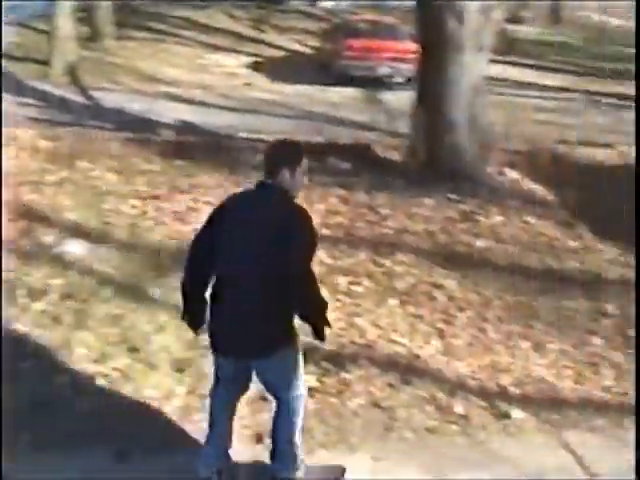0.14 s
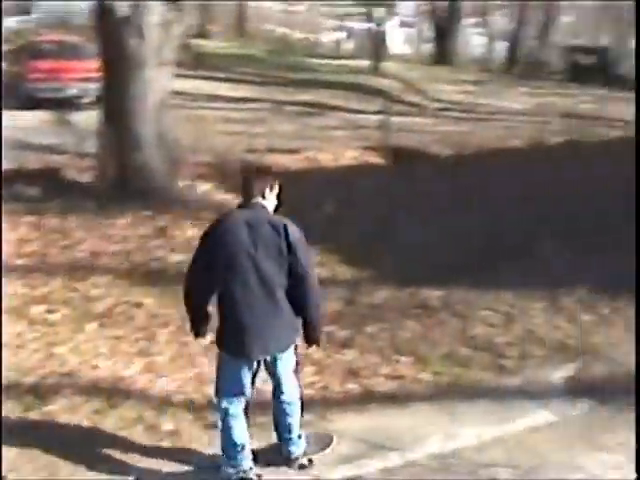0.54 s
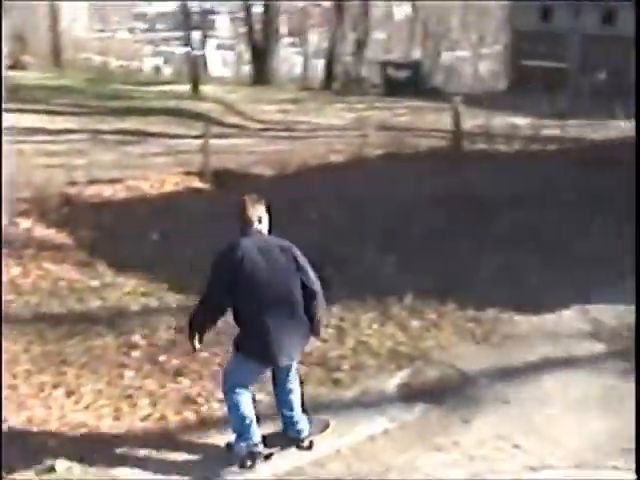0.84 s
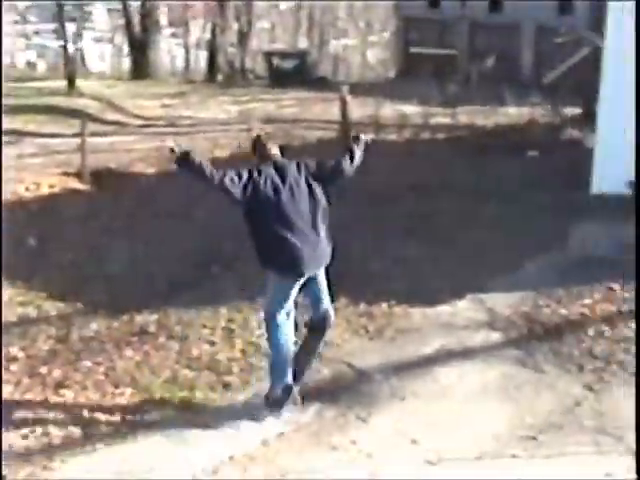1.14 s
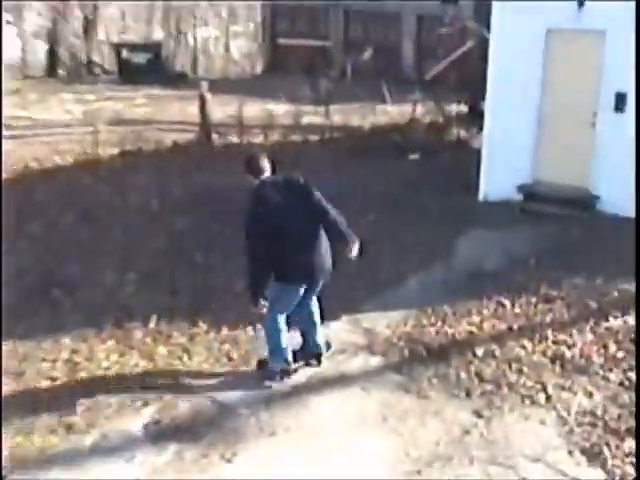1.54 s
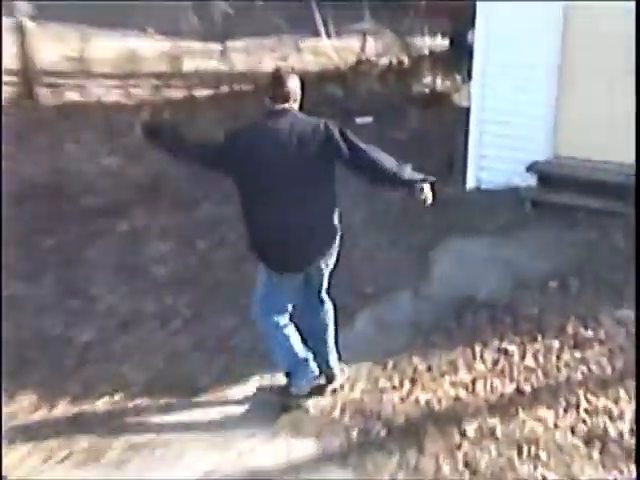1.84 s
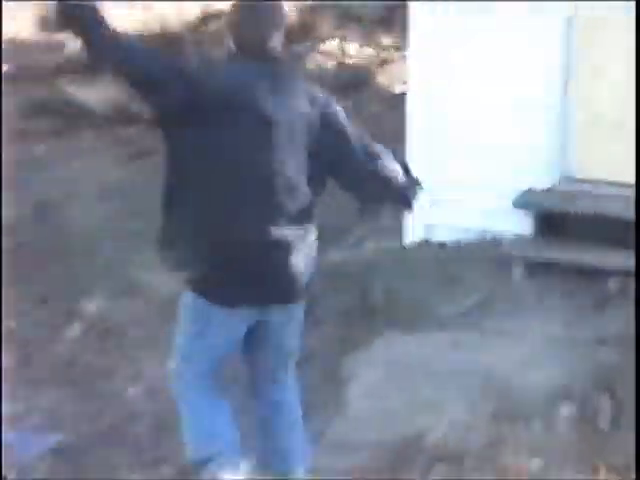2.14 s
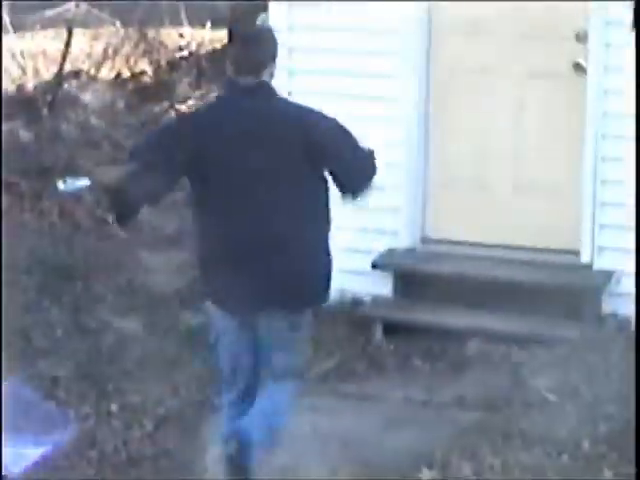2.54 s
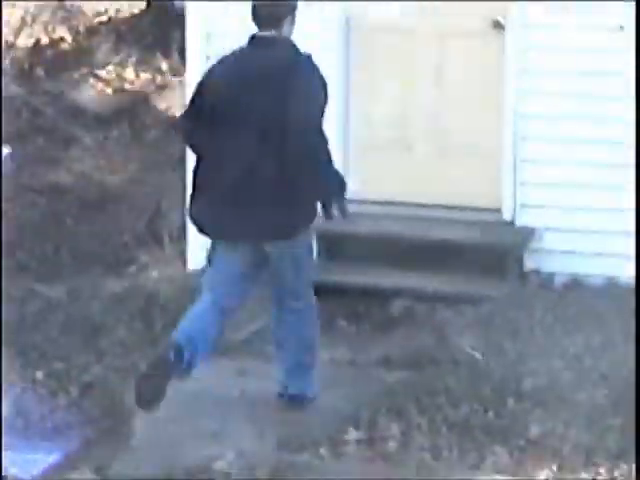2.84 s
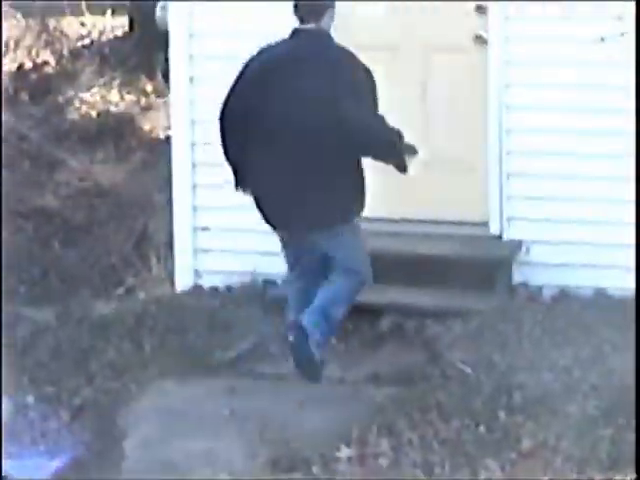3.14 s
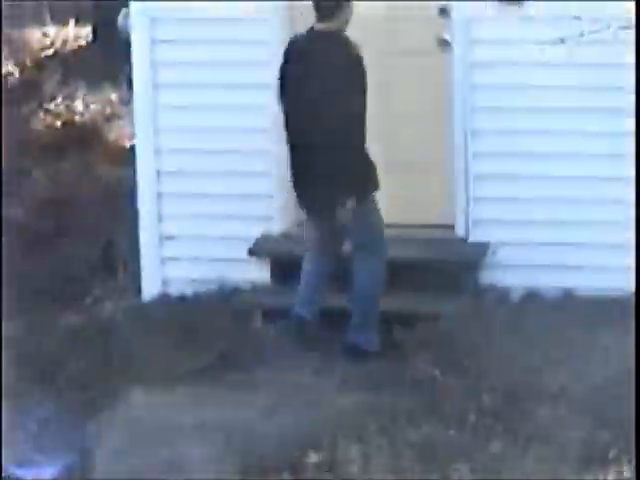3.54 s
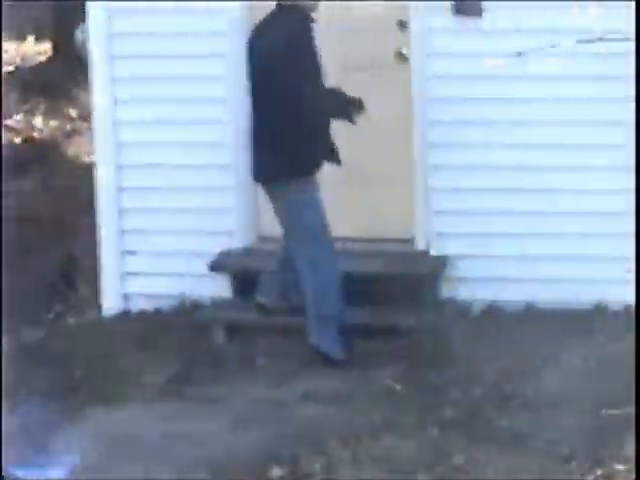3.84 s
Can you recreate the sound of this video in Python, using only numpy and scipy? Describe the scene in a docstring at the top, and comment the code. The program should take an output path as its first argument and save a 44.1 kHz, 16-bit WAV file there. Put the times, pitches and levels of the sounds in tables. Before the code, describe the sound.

Skateboard wheels roll and rattle on coarse pavement outdoors. The tail snaps, the board lands and rolls briefly to a stop, then wooden knocks mix with a few gritty footsteps. The microphone picks everything up on the right side only.

```python
"""A skateboard rumbles over rough pavement, pops into a small jump, lands, rolls on and stops.
The pavement's grain drums the wooden deck, rattles the trucks and crackles under the wheels.
The rider steps off, the board clatters, and shoes thud and scuff on grit; a house wall answers faintly.
All of it is on the right channel; the left carries only faint electrical noise."""
import sys
import numpy as np
from scipy import signal
from scipy.fft import rfft, irfft, next_fast_len
from scipy.io import wavfile
from scipy.ndimage import uniform_filter1d, map_coordinates

SR = 44100
rng = np.random.default_rng(int(sys.argv[2]) if len(sys.argv) > 2 else 0)


def inscribe(sig):
    """Save sig as 16-bit PCM at rate SR to the path in sys.argv[1].

    A 1-D sig is mono; a 2-D sig holds one channel per row.
    Samples are clipped to [-1, 1] before scaling.
    """
    pcm = np.round(np.clip(np.atleast_2d(sig).T, -1, 1) * 32767)
    wavfile.write(sys.argv[1], SR, pcm.astype(np.int16))


N = 176400
DECK_HITS_PER_S, TRUCK_HITS_PER_S, GRIT_HITS_PER_S = 1400, 1200, 1700


def amp(db):
    """Decibels to gain."""
    return 10 ** (np.asarray(db) / 20)


def unit(x):
    """Scale to rms 1."""
    return x / np.sqrt(np.mean(x ** 2) + 1e-20)


def along(points, hz):
    """Interpolate (f/Hz, value) points on a log frequency axis."""
    point_hz, values = np.transpose(points)
    return np.interp(np.log(hz + 1), np.log(point_hz + 1), values)


def colour(x, spectrum, size=8192):
    """Minimum-phase filter from (f/Hz, level/dB) points; keeps the power of white noise."""
    gain = amp(along(spectrum, np.fft.rfftfreq(size, 1 / SR)))
    cepstrum = irfft(np.log(gain))
    cepstrum[1:size // 2] *= 2
    cepstrum[size // 2 + 1:] = 0
    impulse = irfft(np.exp(rfft(cepstrum)))[:size // 2]
    return signal.fftconvolve(x, impulse / np.linalg.norm(impulse))[:len(x)]


def resonance(x, hz, width_hz):
    """Ring one resonance, whose centre may move; rms 1."""
    carrier = np.exp(2j * np.pi * np.cumsum(hz * np.ones(N)) / SR)
    pole = np.exp(-2 * np.pi * width_hz / SR)
    baseband = signal.lfilter([1], [1, -2 * pole, pole ** 2], x / carrier)
    return unit((baseband * carrier).real)


def wobble(knots_per_s):
    """Smooth random curve."""
    return map_coordinates(rng.standard_normal(N // 20), [np.arange(N) * knots_per_s / SR], mode="wrap")


def contacts(hits_per_s, spread_db, hiss):
    """Tiny random impacts, mostly small and a few large, over friction noise; rms 1."""
    hit = rng.random(N) < hits_per_s / SR
    size = amp(spread_db * np.minimum(rng.standard_exponential(N), 4))
    impacts = unit(hit * size * np.sign(rng.standard_normal(N)))
    return unit(impacts + hiss * rng.standard_normal(N))


def add(out, start_s, x):
    """Mix x into out at start_s."""
    part = out[max(round(start_s * SR), 0):][:len(x)]
    part += x[:len(part)]


def bursts(times_s, levels_db, t60_s):
    """Envelope that jumps at each time and dies away."""
    envelope, t = np.zeros(N), np.arange(SR // 4) / SR
    for start_s, db in zip(times_s, levels_db):
        add(envelope, start_s, amp(db - 60 * t / t60_s))
    return envelope


def noise_bursts(times_s, levels_db, t60_s):
    """Decaying bursts of white noise."""
    return bursts(times_s, levels_db, t60_s) * rng.standard_normal(N)


# outdoor background [f/Hz, level/dB]
AIR_SPECTRUM = [(20, -15.5), (180, -1.5), (400, -6.5), (850, -8), (2000, -20), (5000, -29), (6700, -28.5),
                (7300, -35), (14000, -49)]

def air():
    """Steady hush of the neighbourhood."""
    return amp(-50) * colour(rng.standard_normal(N), AIR_SPECTRUM)


# echo decay [f/Hz, t60/s]
YARD_DECAY = [(150, 0.27), (1600, 0.48), (10000, 0.48)]

def yard_echo(x, rise_s=0.0046):
    """Wall and trees reflect the sound; the bass dies first."""
    hz, t, bands = signal.stft(rng.standard_normal(SR // 2), SR, nperseg=256)
    decay = amp(-60 * t / along(YARD_DECAY, hz)[:, None])
    _, tail = signal.istft(bands * decay, SR, nperseg=256)
    tail *= 1 - np.exp(-np.arange(len(tail)) / SR / rise_s)
    return signal.fftconvolve(x, tail / np.linalg.norm(tail))[:N]


# grain snaps [t/s, level/dB]
GRIT_TICKS = [(3.655, -54.5)]
# snapping grain [f/Hz, level/dB]
TICK_SPECTRUM = [(3000, -30), (9000, 6), (12000, -6)]

def grit_ticks():
    """A single grain snaps brightly under a shoe."""
    times_s, db = np.transpose(GRIT_TICKS)
    return colour(noise_bursts(times_s, db, t60_s=0.015), TICK_SPECTRUM)


# sole drags [t/s, length/s, level/dB]
SHOE_SCUFFS = [(2.442, 0.071, -42), (2.818, 0.17, -51.5), (2.992, 0.16, -44), (3.288, 0.075, -43.5),
               (3.389, 0.12, -44)]
# dragging sole [f/Hz, level/dB]
SCUFF_SPECTRUM = [(200, 9.5), (700, 6), (2000, 2), (8000, -15), (13000, -35)]

def shoe_scuffs():
    """Soles drag over grit in soft swells."""
    pressure = np.zeros(N)
    for start_s, length_s, db in SHOE_SCUFFS:
        add(pressure, start_s, amp(db) * np.sqrt(np.hanning(int(length_s * SR))))
    return colour(pressure * contacts(GRIT_HITS_PER_S, spread_db=2.5, hiss=1), SCUFF_SPECTRUM)


# footfalls [t/s, thud level/dB, thud f/Hz, crunch level/dB]
FOOTFALLS = [(2.768, -26, 261, -29.5), (2.929, -26.5, 232, -32.5), (2.943, -30, 277, -32.5),
             (3.304, -26.5, 198, -40.5)]
# thud modes [ratio to thud f, level/dB, t60/s]
THUD_MODES = [(.72, -4.5, 0.047), (1, 5, 0.038)]
# flat slap of a sole [f/Hz, level/dB]
SLAP_SPECTRUM = [(150, -21), (330, 18), (650, 6.5), (1600, -42)]
# grit under a sole [f/Hz, level/dB]
CRUNCH_SPECTRUM = [(350, 2.5), (800, 8), (3300, -1.5), (5000, -5.5), (8800, -14.5), (14000, -32)]

def footsteps(rise_s=0.0025, low_cut_hz=90):
    """A shoe thuds and slaps on the ground and crushes grit."""
    thuds, t = np.zeros(N), np.arange(SR // 4) / SR
    ratio, mode_db, t60_s = np.transpose(THUD_MODES)[:, :, None]
    attack = 1 - np.exp(-(t / rise_s) ** 2)
    for start_s, db, hz, _ in FOOTFALLS:
        phase = rng.random((len(THUD_MODES), 1))
        modes = amp(mode_db - 60 * t / t60_s) * np.sin(2 * np.pi * (hz * ratio * t + phase))
        add(thuds, start_s, amp(db + 6) * modes.sum(0) * attack)
    times_s, thud_db, _, crunch_db = np.transpose(FOOTFALLS)
    slaps = colour(noise_bursts(times_s, thud_db - 8, t60_s=0.055), SLAP_SPECTRUM)
    grains = contacts(GRIT_HITS_PER_S, spread_db=2.5, hiss=0.8)
    crunch = colour(bursts(times_s, crunch_db, t60_s=0.12) * grains, CRUNCH_SPECTRUM)
    low_cut = signal.butter(2, low_cut_hz, "high", fs=SR, output="sos")
    return signal.sosfilt(low_cut, thuds + slaps) + crunch


# free-spinning wheels [f/Hz, level/dB]
WHIRR_SPECTRUM = [(150, -15), (360, -1.5), (480, -11.5), (1000, -3), (2100, -6), (3000, -15.5), (9000, -25),
                  (11000, -44)]

def bearing_whirr(start_s=1.17, end_s=1.49, fade_db_per_s=13.5):
    """The bearings whirr and fade while the board is off the ground."""
    t = np.arange(N) / SR
    aloft = (t > start_s) & (t < end_s)
    envelope = aloft * amp(-42.5 - fade_db_per_s * (t - start_s))
    return colour(envelope * rng.standard_normal(N), WHIRR_SPECTRUM)


# sideways slides [t/s, length/s, centre f/Hz, level/dB]
BOARD_SCRAPES = [(1.158, 0.014, 3970, -34), (1.201, 0.022, 2760, -34), (1.891, 0.058, 1610, -29),
                 (1.974, 0.017, 3400, -27)]

def board_scrapes(relative_width=0.21):
    """Tail and wheels scrape the pavement; rapid slips excite one resonance for a moment."""
    out = np.zeros(N)
    for start_s, length_s, hz, db in BOARD_SCRAPES:
        slips = contacts(TRUCK_HITS_PER_S, spread_db=1.5, hiss=0.51)
        ring = resonance(slips, hz, hz * relative_width)
        n = int(length_s * SR)
        add(out, start_s, amp(db) * np.hanning(n) * ring[:n])
    return out


# grit on pavement [f/Hz, level/dB]
GRIT_SPECTRUM = [(1200, -5), (2400, 1), (3000, 0), (4400, -4.5), (5200, -8.5), (7200, -8.5), (8900, -10),
                 (10000, -20), (14000, -31.5)]

def grit_crackle(force):
    """Grit crackles brightly under the board."""
    return colour(force, GRIT_SPECTRUM)


# truck response [f/Hz, level/dB]
TRUCK_SPECTRUM = [(400, -26), (1100, 10), (1600, 3), (2130, 3), (2450, -10), (2850, -7.5), (5000, -52.5)]

def truck_rattle(force):
    """The shaken trucks ring in the midrange."""
    return colour(force, TRUCK_SPECTRUM)


# tail, wheel and deck strikes [t/s, ring level/dB, crack level/dB, ring centre f/Hz]
BOARD_STRIKES = [(1.141, -20.5, -45, 915), (1.204, -25, -41, 1430), (1.388, -27.5, -36, 970),
                 (1.413, -30.5, -44, 1520), (1.4836, -23.5, -29, 920), (1.524, -25, -29.5, 1200),
                 (1.534, -24, -36, 1200), (1.985, -19, -35, 880), (2.339, -26.5, -42, 890),
                 (2.622, -39.5, -47.5, 1340), (2.794, -24.5, -39, 1530), (2.978, -31, -47, 1410),
                 (3.036, -28.5, -33, 1190), (3.066, -26.5, -58, 1040), (3.095, -32.5, -46, 2130),
                 (3.121, -38, -66, 2000), (3.141, -30.5, -38.5, 2130), (3.169, -32, -60, 1870),
                 (3.645, -42.5, -64, 940)]
# modes of the free board [f/Hz, level/dB, t60/s]
BOARD_MODES = [(340, 3, 0.061), (680, 7, 0.035), (883, 2.5, 0.042), (1065.4, -3, 0.093), (1483, -9.5, 0.16),
               (1744, 2.5, 0.042), (1890, 1, 0.038), (2280, 1.5, 0.033), (2800, -3.5, 0.029)]

def board_clacks(rise_s=0.0015, focus_db_per_oct2=9):
    """Each blow rings the board's modes near its centre pitch, shakes the trucks and cracks on grit."""
    rings, t = np.zeros(N), np.arange(SR // 4) / SR
    hz, mode_db, t60_s = np.transpose(BOARD_MODES)[:, :, None]
    attack = 1 - np.exp(-t / rise_s)
    for start_s, db, _, centre_hz in BOARD_STRIKES:
        strength, detune, phase = rng.standard_normal((3, len(BOARD_MODES), 1))
        weights = amp(mode_db + 2 * strength - focus_db_per_oct2 * np.log2(hz / centre_hz) ** 2)
        weights /= np.linalg.norm(weights)
        detuned_hz = hz * (1 + 0.021 * detune)
        modes = weights * amp(-60 * t / t60_s) * np.sin(2 * np.pi * (detuned_hz * t + phase))
        add(rings, start_s, 2 * amp(db - 2) * modes.sum(0) * attack)
    times_s, ring_db, crack_db, _ = np.transpose(BOARD_STRIKES)
    clatter = truck_rattle(noise_bursts(times_s, ring_db - 7, t60_s=0.045))
    cracks = grit_crackle(noise_bursts(times_s, crack_db, t60_s=0.064))
    return rings + clatter + cracks


# booming deck [f/Hz, level/dB]
BOOM_SPECTRUM = [(90, -31), (165, 11), (320, 3), (600, -36)]

def deck_boom(peak_s=0.89, width_s=0.047):
    """Coarser pavement briefly drives the deck's lowest bending mode."""
    swell = amp(-33.5) * np.exp(-((np.arange(N) / SR - peak_s) / width_s) ** 2)
    return colour(swell * contacts(DECK_HITS_PER_S, spread_db=6, hiss=0), BOOM_SPECTRUM)


# cracks and stones [t/s, level/dB]
WHEEL_BUMPS = [(0.2838, -21), (0.599, -24), (0.691, -21.5), (0.7525, -33), (0.786, -26), (1.612, -24.5),
               (1.7458, -34), (1.7982, -26), (1.872, -29.5), (2.044, -28)]
# jolted board [f/Hz, level/dB]
BUMP_SPECTRUM = [(100, -15), (300, 10), (600, 2.5), (2100, 12), (5200, -6), (8800, -6.5), (10000, -27),
                 (14000, -25)]

def wheel_bumps():
    """A wheel hits a crack or stone: a short dense rattle through the whole board."""
    times_s, db = np.transpose(WHEEL_BUMPS)
    return colour(noise_bursts(times_s, db - 2.5, t60_s=0.038), BUMP_SPECTRUM)


# brief losses of load [t/s, length/s, depth/dB]
WHEEL_SKIPS = [(0.183, 0.014, 7), (0.606, 0.04, 13), (0.646, 0.041, 5.5)]

def wheel_load_db(flutter_db=2, edge_s=0.0028):
    """Level change as the load flutters and the wheels skip."""
    dip_db = np.zeros(N)
    for start_s, length_s, depth_db in WHEEL_SKIPS:
        add(dip_db, start_s, np.full(int(length_s * SR), depth_db))
    return flutter_db * wobble(knots_per_s=120) - uniform_filter1d(dip_db, int(edge_s * SR) + 1)


# roll before the jump [t/s, deck level/dB, growl level/dB, truck level/dB, grit level/dB]
RUN_UP_LEVELS = [(0, -26, -35.5, -31, -32), (.07, -44, -36, -30, -38.5), (.115, -28, -32, -25.5, -30.5),
                 (.18, -25, -29.5, -34, -36), (.35, -30, -34, -30.5, -36), (.49, -31, -25.5, -30, -33.5),
                 (.58, -26, -28, -31, -35.5), (.78, -32, -30.5, -32, -37), (.88, -27, -28.5, -36, -35.5),
                 (1.0, -27.5, -33, -37, -38.5), (1.1, -30, -34, -32, -35), (1.16, -33.5, -34, -30, -34.5),
                 (1.19, -48, -46, -36, -46), (1.26, -58, -52, -42, -51)]
# roll after landing [t/s, deck level/dB, growl level/dB, truck level/dB, grit level/dB]
RUN_OUT_LEVELS = [(1.48, -39.5, -46, -42, -49), (1.63, -29.5, -38, -31.5, -37.5),
                  (1.78, -29.5, -44.5, -31.5, -37.5), (1.9, -36, -31.5, -34.5, -41.5),
                  (2.09, -29.5, -33.5, -31, -40.5), (2.19, -33.5, -38.5, -36.5, -46),
                  (2.3, -36, -37, -33, -43), (2.45, -55, -59, -54, -59)]
# loaded deck [f/Hz, level/dB]
DECK_SPECTRUM = [(40, -35), (110, -17.5), (170, -6.5), (300, 3.5), (460, -6), (850, -6.5), (1050, -2.5),
                 (1350, -31.5), (2500, -49.5)]

def rolling(run, growl_width_hz, axle_hz, growl_hz=680, wander_hz=18):
    """The pavement's grain drives deck, trucks, axles and grit; all follow the load on the wheels."""
    t = np.arange(N) / SR
    times_s, *levels_db = np.transpose(run)
    load_db = wheel_load_db()
    deck_gain, growl_gain, truck_gain, grit_gain = [
        amp(np.interp(t, times_s, db, left=-np.inf, right=-np.inf) + load_db) for db in levels_db]
    deck_hits, growl_hits = [contacts(DECK_HITS_PER_S, spread_db=0.5, hiss=0) for _ in range(2)]
    truck_hits, axle_hits = [contacts(TRUCK_HITS_PER_S, spread_db=3.5, hiss=0.25) for _ in range(2)]
    rumble = colour(deck_gain * deck_hits, DECK_SPECTRUM)
    # the deck's hollow mode shifts with the rider's weight
    hollow_hz = growl_hz + wander_hz * wobble(knots_per_s=10.14)
    growl = growl_gain * resonance(growl_hits, hollow_hz, growl_width_hz)
    trucks = truck_rattle(amp(-4.5) * truck_gain * truck_hits)
    axles = amp(-8.5) * truck_gain * resonance(axle_hits, axle_hz, width_hz=225)
    grit = grit_crackle(amp(-1.5) * grit_gain * contacts(GRIT_HITS_PER_S, spread_db=3.5, hiss=0.53))
    return rumble + growl + trucks + axles + grit


def scene():
    """Board and rider in the yard, on the right channel alone."""
    roll = rolling(RUN_UP_LEVELS, growl_width_hz=72, axle_hz=2055)
    roll += rolling(RUN_OUT_LEVELS, growl_width_hz=125, axle_hz=1684)
    roll += wheel_bumps() + deck_boom() + bearing_whirr()
    hits = board_clacks() + board_scrapes() + footsteps() + shoe_scuffs() + grit_ticks()
    echo = yard_echo(amp(-17.5) * roll + amp(-8) * hits)
    right = 2 * (roll + hits + echo + air())
    return np.array([np.zeros(N), right])


# electrical noise of the dead left input [f/Hz, level/dB]
IDLE_SPECTRUM = [(10, 1.5), (400, -41.5), (7000, -50), (10000, -72)]

def record(dry, ceiling=0.43, top_hz=14400):
    """Round off the highest peaks, add faint noise on the left and cut everything above top_hz."""
    x = dry / (1 + (dry / ceiling) ** 4) ** (1 / 4)
    x[0] += amp(-65.5) * colour(rng.standard_normal(N), IDLE_SPECTRUM)
    size = next_fast_len(N + SR // 2)
    passband = np.fft.rfftfreq(size, 1 / SR) < top_hz
    return irfft(rfft(x, size) * passband, size)[:, :N]


dry = scene()
out = record(dry)
inscribe(out)
```